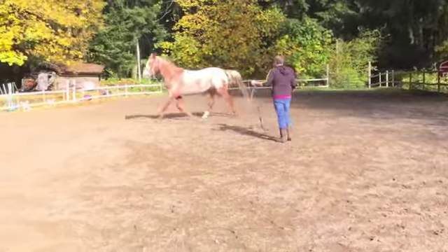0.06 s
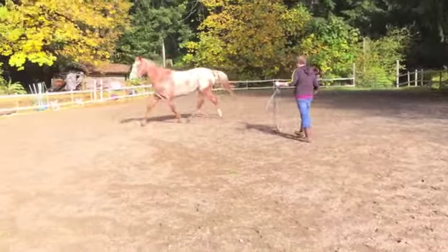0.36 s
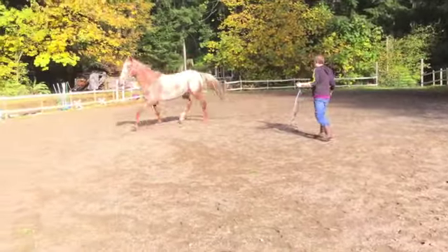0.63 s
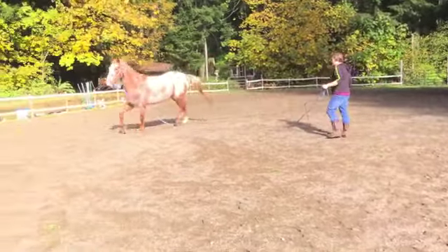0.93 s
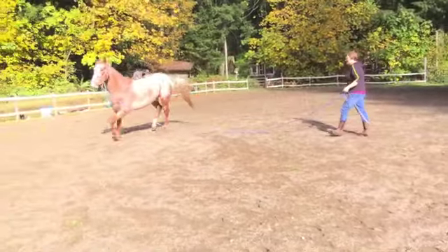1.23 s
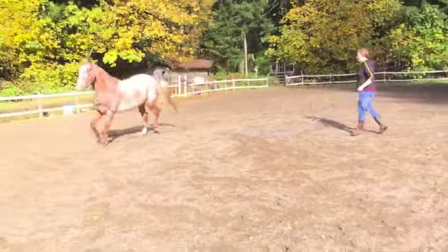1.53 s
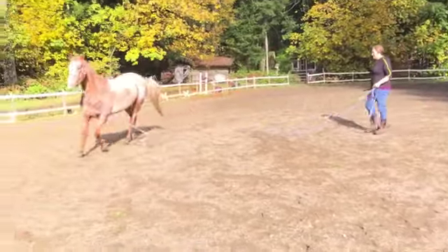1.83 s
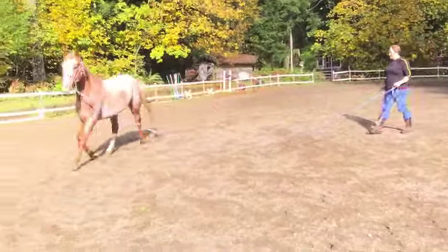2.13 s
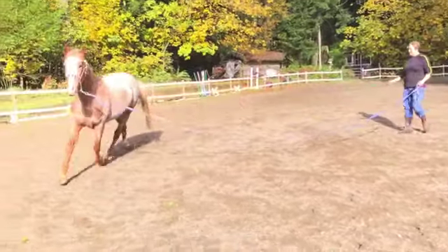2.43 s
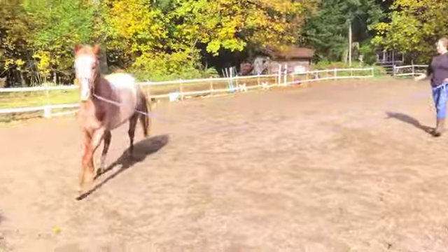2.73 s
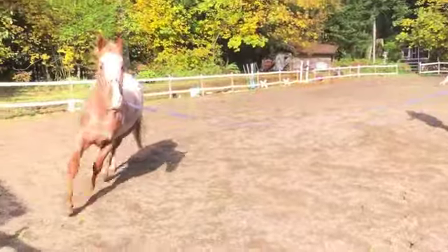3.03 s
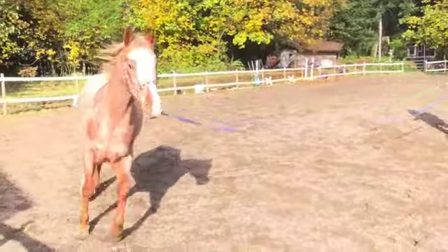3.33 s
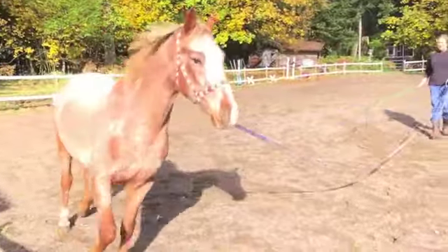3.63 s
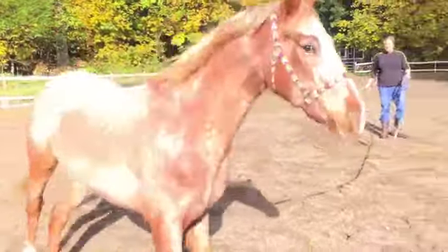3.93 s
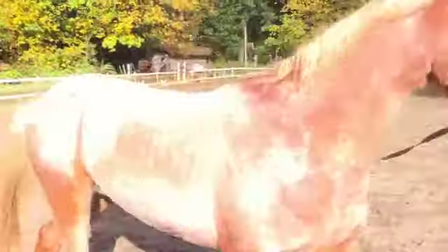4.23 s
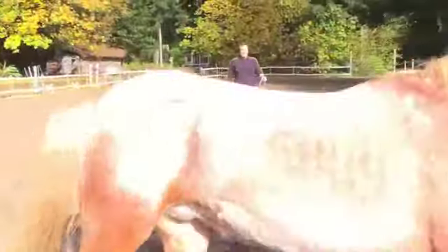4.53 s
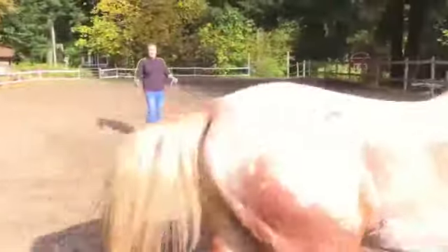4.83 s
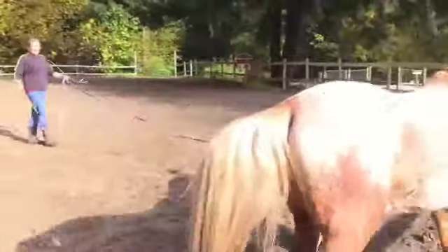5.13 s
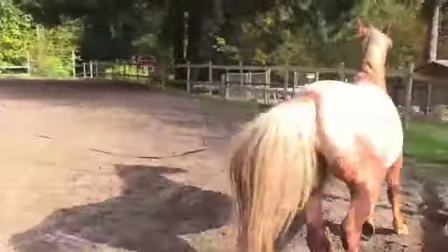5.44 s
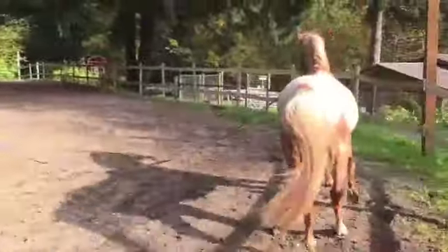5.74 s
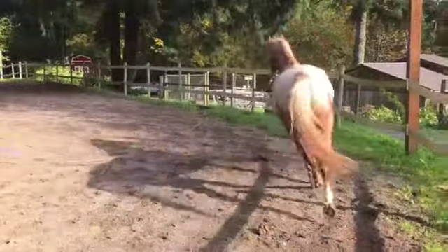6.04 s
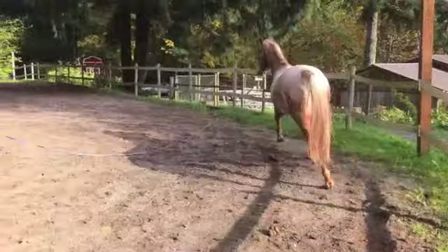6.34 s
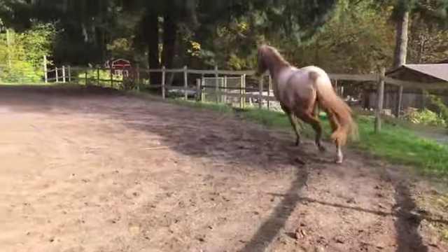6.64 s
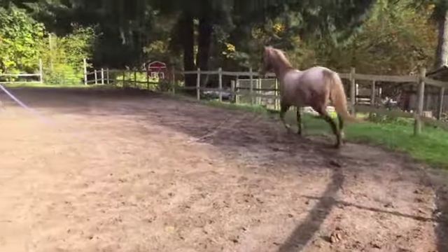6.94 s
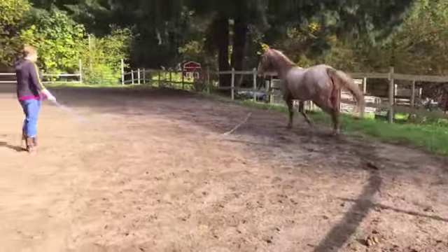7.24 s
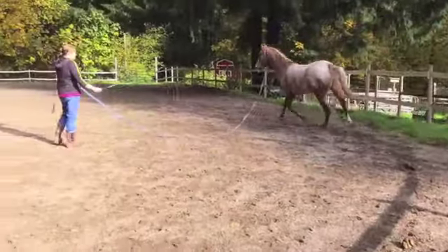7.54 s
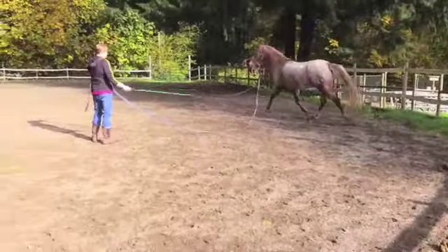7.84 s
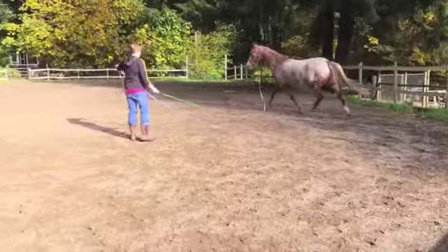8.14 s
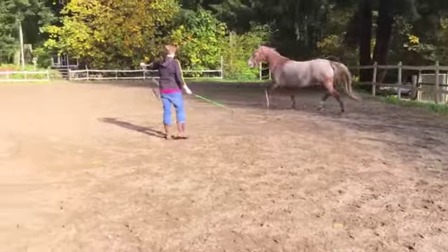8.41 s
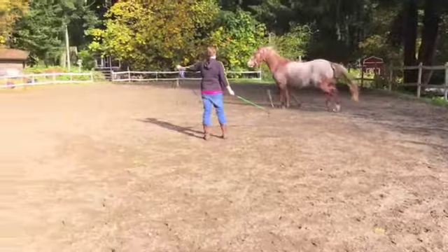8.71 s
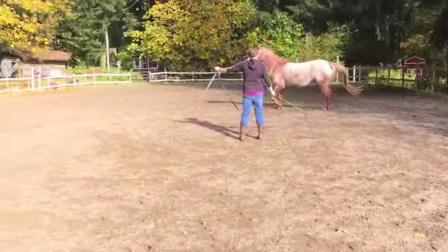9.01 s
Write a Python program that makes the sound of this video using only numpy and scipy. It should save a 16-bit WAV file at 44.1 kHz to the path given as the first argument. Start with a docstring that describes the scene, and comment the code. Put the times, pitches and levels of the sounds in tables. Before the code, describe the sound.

Distant trotting hooves crunch on sand in an open riding arena, over a quiet hiss of outdoor air. The horse comes nearer, with deeper thuds, scraping toes and a few tiny clinks of tack. It is loudest about halfway, passing close to the microphone with a sharp hoof crack and snapping clods. The trot keeps its pace as it moves off, with small pebble ticks and lighter clops.

```python
"""A trotting horse circles on a lunge line in an outdoor dirt arena, passing close to the listener.
Each hoof is an impact on a granular layer: the sand crunches in many tiny collisions, the packed
ground beneath rings in its low modes, and the toe scuffs the sand between landings. Clods snap,
thrown sand trickles down, pebbles tick, the tack jingles, and near the closest point a hoof cracks
on something hard. Fence and trees return a faint tail over a steady hiss and a low rumble."""
import sys
import numpy as np
from scipy import signal
from scipy.fft import rfft, irfft
from scipy.io import wavfile

SR = 44100
rng = np.random.default_rng(int(sys.argv[2]) if len(sys.argv) > 2 else 0)


def master_out(mix):
    """Clip the mix to full scale and print it as 16-bit PCM to the path in sys.argv[1]."""
    frames = np.transpose(np.atleast_2d(mix))
    ceiling = np.clip(frames, -1, 1)
    pcm = np.round(ceiling * 32767).astype(np.int16)
    wavfile.write(sys.argv[1], SR, pcm)


N = 399987

# The trot, in diagonal pairs of hooves: a lands first, b just after. Each row: start and lag of b in
# seconds, crunch of a and b in dB, slide of a and b in seconds, brightness of a and b in dB per octave,
# delay of the full weight in seconds, boom and knock in dB, knock pitch in Hz.
# Levels are relative to an ordinary step.
TROT = [(0.245, 0.041, -7.5, -1.5, 0.041, 0.0043, -1, -0.8, 0.0034, 5.5, 5, 175),
        (0.593, 0.022, -6, -5, 0.051, 0.0099, -3.5, 0, 0.0015, -1, 7.5, 200),
        (0.957, 0.028, -3.5, -4, 0.026, 0.016, 0.5, 0, -0.011, 7, 3, 232),
        (1.276, 0.032, -5, -4, 0.023, 0.016, -3, 2.5, 0.032, 11, 20.5, 210),
        (1.61, 0.024, -1.5, 3, 0.015, 0.027, 1, -0.5, 0.0012, 3.5, 4, 211),
        (1.952, 0.04, 1, -4.5, 0.015, 0.011, 0.3, 1, 0.027, 0.5, 8, 207),
        (2.315, 0.017, 4.5, -1.5, 0.011, 0.016, -1.5, -1.5, -0.0084, -7, -1, 427),
        (2.631, 0.029, -9.5, -1.5, 0.041, 0.013, -0.5, -1, 0.021, -0.5, 7, 159),
        (2.994, 0.02, 1, 0.5, 0.0073, 0.016, 1, 0, -0.014, 0, 2, 166),
        (3.311, 0.036, -6, -1, 0.036, 0.013, -1.5, 0, 0.043, 4.5, -2, 350),
        (3.692, 0.026, 3, -4.5, 0.011, 0.01, 0.7, 0.5, -0.014, 6, -1, 230),
        (4.024, 0.031, 0.1, -1.5, 0.067, 0.011, 0.5, 0, 0.033, 14.5, 8, 577),
        (4.398, 0.026, 1, -4.5, 0.025, 0.01, -0.5, 0.5, -0.0081, 8, 3, 260),
        (4.75, 0.027, -9, -3.5, 0.067, 0.015, -0.9, 0.3, 0.019, 5, -1, 527),
        (5.104, 0.05, -6, -2, 0.024, 0.025, -1, 3, 0.002, -4.5, -0.5, 218),
        (5.458, 0.06, -6.5, -9, 0.036, 0.029, 0, 1.4, 0.059, 3, 2, 166),
        (5.839, 0.056, -1.5, -1.1, 0.017, 0.03, 0.4, 1.5, 0.022, 6.5, -3, 182),
        (6.226, 0.05, -4.5, -9.5, 0.021, 0.022, 3.5, 1, 0.048, 7.5, 5.5, 286),
        (6.589, 0.064, -5, -2, 0.017, 0.017, -1.5, 1, 0.049, 2.5, -3, 236),
        (6.951, 0.06, -2.5, -8.5, 0.017, 0.01, -2.1, -3, 0.058, -5, -1, 230),
        (7.365, 0.025, -5.5, -8.5, 0.024, 0.016, -0.7, 2, 0.015, -17, -7, 383),
        (7.677, 0.046, -13, -12.5, 0.028, 0.013, 2, 5, 0.048, -1.5, -13, 199),
        (8.056, 0.031, -8.5, -4.5, 0.027, 0.011, 2.5, 3, 0.0013, -15, -2.5, 177),
        (8.377, 0.038, -9.5, -16.5, 0.011, 0.021, 2, 1, 0.0018, -9, 0, 250),
        (8.717, 0.029, -12.5, -12, 0.018, 0.042, 0, -0.5, 0.077, 4.5, -11, 200)]
# Crushed sand. Each row: frequency in Hz, relative spectral level in dB.
CRUNCH_SPECTRUM = [(60, -5.5), (200, -5.5), (380, -6), (540, -12.5), (900, -3.5), (1600, -1.5), (2700, 1.5),
                   (4100, 0.5), (5000, -1.5), (9000, -3), (10400, -7), (15000, -9)]
CRUNCH_DB = -27  # an ordinary step at 1 m


def landings():
    """Granular compaction: each hoof crushes the sand as it sinks in, then slides to rest."""
    bursts = []
    for s, lag, db_a, db_b, slide_a, slide_b, bright_a, bright_b, *_ in TROT:
        sink = footing(s)["sink_s"]
        bursts += [(s, CRUNCH_DB + db_a, sink, slide_a, bright_a),
                   (s + lag, CRUNCH_DB + db_b, sink, slide_b, bright_b)]
    return sand(bursts, CRUNCH_SPECTRUM, grains_per_s=9500, spread_db=0.5, ripple_db=6, clump_db=3,
                shape=1.254, families=3)


def knock(hz, cycles, size=4096):
    """A damped oscillation, falling 60 dB in the given cycles; sand cushions the first half cycle."""
    t = np.arange(size) / SR
    t60 = cycles / hz
    cushion = 1 - np.exp(-2 * hz * t)
    return (ring(t, hz, t60) - 0.06 * ring(t, hz * 1.72, t60 / 2)) * cushion


def knocks(touch_db, touch_hz, weight_db):
    """Impact excitation: each hoof knocks lightly at touchdown; the full weight gives the main knock."""
    out = np.zeros(N)
    for s, lag, db_a, db_b, *_, delay, _, knock_db, hz in TROT:
        for at, db in (s, db_a), (s + lag, db_b):
            add(out, at, amp(touch_db + db) * knock(touch_hz * rng.uniform(0.67, 1.12), cycles=5.8))
        add(out, s + delay, amp(weight_db + knock_db) * knock(hz, cycles=9.4))
    return out


# Packed ground under the sand. Each row: frequency in Hz, relative level in dB, 60 dB decay in seconds.
GROUND_MODES = [(61.1, -10, 0.84), (87.8, -1.5, 0.25), (103.3, 2.5, 0.27), (131.2, 2.5, 0.12)]


def booms(step_db, swell_s, detune, size=16384):
    """Modal response: the ground booms under the weight, tuned a little differently at every spot."""
    out, t = np.zeros(N), np.arange(size) / SR
    swell = 1 - np.exp(-t / swell_s)
    for s, *_, delay, boom_db, _, _ in TROT:
        tunings = 1 + detune * rng.uniform(-1.29, 1, len(GROUND_MODES))
        signs = rng.choice([-1, 1], len(GROUND_MODES))
        boom = sum(sign * amp(db) * ring(t, hz * tuning, t60)
                   for (hz, db, t60), tuning, sign in zip(GROUND_MODES, tunings, signs))
        add(out, s + delay, amp(step_db + boom_db) * unit(boom * swell))
    return out


# The hollow of a hoof. Each row: frequency in Hz, relative spectral level in dB.
CLOP_SPECTRUM = [(200, -26), (520, -26), (700, -3.5), (880, -2.5), (1150, -7), (1600, -8), (3000, -10),
                 (15000, -22)]


def clops(rise_s, fall_s):
    """Cavity resonance: each hoof gives a short hollow clop, stronger where the earth is firm."""
    bursts = [(at, CRUNCH_DB + db + footing(s)["clop_db"], rise_s, fall_s, 0)
              for s, lag, db_a, db_b, *_ in TROT for at, db in [(s, db_a), (s + lag, db_b)]]
    return sand(bursts, CLOP_SPECTRUM, grains_per_s=4000, spread_db=3, ripple_db=4.5, clump_db=4,
                shape=1.15, size=8192, families=3)


# Loose sand, then firmer earth. Each row: time in seconds, sinking time of a hoof in seconds,
# thrown sand and hollow clop in dB relative to the crunch.
SURFACE = [(0, 0.0061, -32, -20), (2.3, 0.014, -17, -19), (4.201, 0.0079, -17, -18),
           (5.4, 0.0093, -22, -30), (5.9, 0.004, -31, -10), (7, 0.0043, -24, -20), (8.2, 0.0046, -38, -4),
           (9, .006, -14, -1)]


def footing(s):
    """Compliance of the surface: how slowly a hoof sinks, how much it throws, how hollow it sounds."""
    times, *columns = np.transpose(SURFACE)
    return {name: np.interp(s, times, column)
            for name, column in zip(("sink_s", "spray_db", "clop_db"), columns)}


# Toes scuffing the sand. Each row: time of the peak in seconds, level in dB relative to an ordinary
# drag, rise time in seconds, brightness in dB per octave.
TOE_DRAGS = [(0.545, 2.5, 0.014, -1.5), (1.524, 0, 0.049, -3.2), (1.884, -3.5, 0.03, -2),
             (2.234, -4.5, 0.022, 0), (2.564, -1, 0.033, -2.5), (2.925, -4, 0.051, -3),
             (3.258, 1, 0.037, -0.5), (3.622, -0.5, 0.019, -2.8), (3.669, 6.5, 0.015, -2.5),
             (3.959, 4.5, 0.037, 0), (4.325, 0, 0.028, 0), (4.655, -2.5, 0.023, -0.1),
             (4.696, -3, 0.033, -1.5), (5.065, 4, 0.022, -0.5), (5.371, 5.5, 0.0091, -2),
             (5.411, 1.5, 0.049, -1.5), (5.463, 13.5, 0.017, -2.5), (5.641, -4.5, 0.091, -1),
             (5.78, 5, 0.031, -1.5), (6.133, 3.5, 0.023, -2.5), (6.175, -3, 0.021, 1.5),
             (6.539, 2.5, 0.021, -4), (6.877, 3, 0.018, -2.5), (7.063, 4.5, 0.0081, 2),
             (7.338, 1.5, 0.016, -4.5), (7.973, -6, 0.011, -1), (8.029, 4.5, 0.018, -2.5),
             (8.286, -3, 0.019, -6), (9.012, 3, 0.016, -11)]
# Loose sand in motion. Each row: frequency in Hz, relative spectral level in dB.
SCRAPE_SPECTRUM = [(60, -22), (300, -10.5), (560, -14), (900, -1), (1400, 1.5), (2500, 2), (4100, 3),
                   (5000, 1.5), (9000, -1), (15000, -9)]


def drags(drag_db, fall_ratio):
    """Sliding friction: a toe scrapes the sand as the leg swings through."""
    bursts = [(s, drag_db + db, rise, fall_ratio * rise, bright) for s, db, rise, bright in TOE_DRAGS]
    return sand(bursts, SCRAPE_SPECTRUM, grains_per_s=6800, spread_db=0, ripple_db=5, clump_db=4,
                shape=3.04)


def sprays(delay_s, rise_s, fall_s):
    """Momentum transfer: a step throws sand, the more the harder it lands and the looser the footing."""
    bursts = [(s + lag + delay_s, CRUNCH_DB + max(db_a, db_b) + footing(s)["spray_db"], rise_s, fall_s, 0)
              for s, lag, db_a, db_b, *_ in TROT]
    return sand(bursts, SCRAPE_SPECTRUM, grains_per_s=6000, spread_db=3.6, ripple_db=4, clump_db=5,
                shape=1.1)


# Hooves pushing off. Each row: start in seconds, level in dB.
PUSH_OFFS = [(2.478, -46), (2.727, -45), (4.565, -42), (5.262, -49)]


def shoves(hz):
    """Reaction force: a hoof shoves off and the ground answers with a soft, deep thud."""
    out = np.zeros(N)
    for s, db in PUSH_OFFS:
        add(out, s, amp(db) * knock(hz, cycles=7.6, size=8192))
    return out


# A hoof striking something hard. Each row: start in seconds, level in dB.
HARD_STRIKES = [(4.08, -10.5)]
# Hoof horn. Each row: frequency in Hz, relative level in dB, 60 dB decay in seconds.
HORN_MODES = [(334, -10.5, 0.021), (543, -8, 0.015), (626, -10, 0.028), (1080, -3.5, 0.0066),
              (1900, -1, 0.0041), (2530, -0.5, 0.0077), (3360, -7.5, 0.0081), (4330, -10, 0.0068)]


def cracks(size=4096):
    """Impulse response of hard horn to a sharp blow; neighbouring modes swing opposite ways."""
    out, t = np.zeros(N), np.arange(size) / SR
    blow = sum((-1) ** k * amp(db) * ring(t, hz, t60) for k, (hz, db, t60) in enumerate(HORN_MODES))
    for s, db in HARD_STRIKES:
        add(out, s, amp(db) * blow)
    return out


# Clods and gravel breaking. Each row: time in seconds, level in dB, crumbling time in seconds,
# brightness in dB per octave.
FRACTURES = [(.661, -46.5, 0.0018, -5), (.961, -45.5, 0.0067, -3), (2.3138, -32.5, 0.0022, -0.5),
             (2.329, -39, 0.0015, 2), (2.9919, -27.5, .003, -3.5), (3.762, -33, 0.0023, 4.5),
             (4.037, -27, 0.0033, -4), (4.7868, -16.5, 0.0022, -3.5), (4.982, -43, 0.0053, 12),
             (5.056, -31, 0.0025, -1), (5.147, -22.5, 0.0037, 2), (5.3588, -32, 0.0046, 1),
             (5.4593, -23.5, 0.0031, -3), (5.661, -38.5, 0.0029, 9), (6.5878, -37, 0.0048, 5),
             (6.635, -39, 0.013, .5), (6.6538, -32, 0.0023, -1), (7.0593, -36.5, 0.0017, 1)]
# A breaking clod. Each row: frequency in Hz, relative spectral level in dB.
SNAP_SPECTRUM = [(450, -19), (1000, -6.5), (1800, -4), (3800, 1.5), (6000, -2.5), (15000, -18)]


def snaps(rise_s):
    """Brittle fracture: a clod or a bit of gravel gives way at once under a hoof, then crumbles."""
    bursts = [(s, db, rise_s, fall, bright) for s, db, fall, bright in FRACTURES]
    return sand(bursts, SNAP_SPECTRUM, grains_per_s=14000, spread_db=2, ripple_db=3.5, clump_db=1.5,
                shape=1, size=4096)


# Small contacts of pebbles and hoof horn. Each row: time in seconds, relative level in dB,
# pitch in Hz, 60 dB decay in seconds, chatter time in seconds.
PEBBLE_CONTACTS = [(1.302, -47, 494, 0.014, 0.0032), (3.271, -47.5, 683, 0.0057, 0.0025),
                   (5.52, -43, 508, 0.034, 0.0028), (6.177, -45, 1414, 0.033, 0.0042),
                   (6.635, -40.5, 970, 0.028, 0.0013), (7.4582, -48.5, 1470, .009, 0.0008),
                   (7.722, -50.5, 1600, 0.033, 0.0036), (8.088, -50.5, 850, 0.031, 0.0029)]


def ticks(tick_db, rasp, size=4096):
    """Contact chatter drives three short modes of a small hard body, inside a broad rasp."""
    out, t = np.zeros(N), np.arange(size) / SR
    for s, db, hz, t60, chatter in PEBBLE_CONTACTS:
        contact = rng.standard_normal(size) * t * np.exp(-t / chatter)
        body = ring(t, hz, t60) + 0.37 * (ring(t, hz * 1.16, t60 / 2) + ring(t, hz * 1.37, t60 / 2))
        tone = signal.fftconvolve(contact, body)[:size]
        band = signal.butter(2, [hz / 2, min(hz * 2, SR / 3)], "band", fs=SR, output="sos")
        broad = signal.sosfilt(band, contact)
        add(out, s - chatter / 2, amp(db + tick_db) * (unit(tone) + rasp * unit(broad)))
    return out


# The tack shaking. Each row: time of the peak in seconds, level in dB, pitch in Hz, half-width in seconds.
TACK_SHAKES = [(2.744, -51.5, 4460, 0.0076), (2.895, -54.5, 3930, .008), (3.172, -51, 4120, 0.0092),
               (3.4572, -39.5, 3800, 0.0037), (3.482, -58, 3820, 0.01), (5.259, -43.5, 4240, 0.0056)]
# Its metal. Each row: multiple of the pitch, relative level in dB, 60 dB decay in seconds.
TACK_MODES = [(.8, -3, .004), (1, 3.5, .009), (1.14, -4, .007), (1.6, -5, 0.0033), (2.8, -7.5, 0.00073)]


def jingles(contacts_per_s, size=4096):
    """Inharmonic ringing: flurries of tiny contacts excite each partial of the metal tack differently."""
    out, t = np.zeros(N), np.arange(size) / SR
    middle = t[size // 2]
    for s, db, hz, half_width in TACK_SHAKES:
        shake = np.exp(-((t - middle) / half_width) ** 2)
        rattle = np.zeros(size)
        for ratio, partial_db, t60 in TACK_MODES:
            contacts = shake * rng.standard_normal(size) * (rng.random(size) < contacts_per_s / SR)
            partial = signal.fftconvolve(contacts, ring(t, hz * ratio, t60))[:size]
            rattle += amp(partial_db) * unit(partial)
        add(out, s - middle, amp(db) * rattle * np.linalg.norm(shake) / (np.linalg.norm(rattle) + 1e-12))
    return out


def trickle(db, grains_per_s, spread_db):
    """Shot noise: single grains patter back onto the ground in uneven showers."""
    sizes = rng.standard_normal(N) * amp(spread_db * np.minimum(rng.exponential(1, N), 4))
    patter = shaped(sizes * (rng.random(N) < grains_per_s / SR), SCRAPE_SPECTRUM)
    return amp(db) * waver(per_s=27, depth_db=2.5) * patter


def arena(x, wet_db, t60, size=32768):
    """Scattering: fence and trees return many small echoes that merge into a faint tail."""
    t = np.arange(size) / SR
    echoes = rng.standard_normal(size) * (rng.random(size) < 2000 / SR) * (t > .006)
    tail = shaped(echoes * np.exp(-np.log(1000) * t / t60), [(100, -13), (3000, -14), (12000, -0.5)])
    return x + amp(wet_db) * signal.fftconvolve(x, tail / np.linalg.norm(tail))[:N]


# Still outdoor air. Each row: frequency in Hz, relative spectral level in dB.
AIR_SPECTRUM = [(15, -61), (25, 4), (56, -8), (107, -1), (482, -15), (970, -12), (1270, -16), (3340, -19),
                (9300, -26.5), (14300, -28.5), (15500, -41)]
# Rumble of the ground and the air. Each row: time in seconds, level in dB.
RUMBLE_LEVELS = [(0, -67.5), (2, -66), (3.3, -63.5), (4.4, -61.5), (5.7, -66), (6.35, -68.5), (6.9, -74.5),
                 (9, -74)]


def background(air_db):
    """Ambient noise: a steady outdoor hiss over a low rumble whose level wanders."""
    rumble_spectrum = [(20, -25), (50, 8), (100, 1), (150, -7.5), (300, -18.5), (1000, -66), (4000, -105)]
    swell = amp(curve(RUMBLE_LEVELS)) * waver(per_s=10, depth_db=5)
    rumble = swell * shaped(rng.standard_normal(N), rumble_spectrum)
    return amp(air_db) * shaped(rng.standard_normal(N), AIR_SPECTRUM) + rumble


def sand(bursts, spectrum, grains_per_s, spread_db, ripple_db, clump_db, shape, size=16384, families=4):
    """Superposed random impulses: families of grains, each with its own colour, give way in clumps."""
    out, hz = np.zeros(N), np.fft.rfftfreq(size, 1 / SR)
    t = (np.arange(size) - size // 2) / SR
    octaves = np.log2(np.clip(hz, 900, 10000) / 3000)
    ripple_hz, clump_times = np.geomspace(150, 16000, 44), t[::128]
    hollow = 1 / (1 + (hz / 6000) ** 2)  # clods resonate in the middle range; fine sand hisses evenly
    grid = (families, size)
    for s, db, rise, fall, bright in bursts:
        clumps = np.array([wander(t, clump_times) for _ in range(families)])
        grain_db = spread_db * np.minimum(rng.exponential(1, grid), 3) + clump_db * clumps
        signs = rng.choice([-1, 1], grid)
        grains = amp(grain_db) * signs * (rng.random(grid) < grains_per_s / families / SR)
        ripple = np.array([wander(hz, ripple_hz) for _ in range(families)])
        gain = amp(colour(spectrum, hz) + bright * octaves + ripple_db * hollow * ripple)
        grit = irfft((rfft(grains) * gain).sum(0), size)
        pressure = np.exp(-abs(t / np.where(t < 0, rise, fall)) ** shape)
        burst = grit * pressure
        # the force of the hoof sets the energy, however the grains fall
        add(out, s + t[0], amp(db) * burst * np.linalg.norm(pressure) / (np.linalg.norm(burst) + 1e-12))
    return out


def ring(t, hz, t60):
    """Free decay of one mode, by 60 dB in t60 seconds."""
    return np.sin(2 * np.pi * hz * t) * np.exp(-np.log(1000) * t / t60)


def wander(x, knots):
    """Linear interpolation between Gaussian random heights at the knots."""
    return np.interp(x, knots, rng.standard_normal(len(knots)))


def waver(per_s, depth_db):
    """Random amplitude modulation, at rms 1."""
    t = np.arange(N) / SR
    return unit(amp(depth_db * wander(t * per_s, np.arange(1024))))


def amp(db):
    """Decibels to amplitude ratio."""
    return 10 ** (np.asarray(db) / 20)


def unit(x):
    """Normalisation to rms 1."""
    return x / np.sqrt(np.mean(x ** 2) + 1e-20)


def colour(points, hz):
    """Interpolation of a spectrum in dB on a log-frequency axis."""
    frequencies, db = np.transpose(points)
    return np.interp(np.log(hz + 1), np.log(frequencies), db)


def curve(rows):
    """Linear interpolation of timed values at every sample."""
    return np.interp(np.arange(N) / SR, *np.transpose(rows))


def shaped(x, points):
    """Filtering in the frequency domain, at rms 1."""
    gain = amp(colour(points, np.fft.rfftfreq(len(x), 1 / SR)))
    return unit(irfft(rfft(x) * gain, len(x)))


def add(mix, s, sound):
    """Superposition: a sound joins the mix at s seconds."""
    start = round(s * SR)
    part = mix[max(start, 0):][:len(sound) + min(start, 0)]
    part += sound[max(-start, 0):][:len(part)]


# The horse's circle. Each row: time in seconds, distance from the listener in metres.
HORSE_PATH = [(0, 12.3), (1.5, 11.2), (3, 3.85), (4, 2.11), (4.6, 0.68), (5.4, 1.21), (6, 2.65), (7, 3.43),
              (9, 5.3)]


def scene():
    """Geometric spreading: airborne steps fall with distance, the ground boom with its square root."""
    metres = curve(HORSE_PATH)
    # the levels of the airborne sounds and of the booms hold at 1 m
    airborne = (landings() + clops(rise_s=0.0064, fall_s=0.018)
                + drags(drag_db=-43, fall_ratio=0.74)
                + sprays(delay_s=0.03, rise_s=0.0068, fall_s=0.032)
                + knocks(touch_db=-45, touch_hz=190, weight_db=-30.5)
                + trickle(db=-62, grains_per_s=3200, spread_db=4.5))
    hard = ticks(tick_db=-14, rasp=0.15) + snaps(rise_s=0.00032) + jingles(contacts_per_s=3000) + cracks()
    ground = booms(step_db=-60, swell_s=0.005, detune=0.12) / np.sqrt(metres) + shoves(hz=88)
    horse = airborne / metres + ground + hard
    return (arena(horse, wet_db=-18.5, t60=1.0) + background(air_db=-68))[None]


LOW_CUT_HZ, HIGH_CUT_HZ = 58.4, 15600


def record(dry):
    """Band limiting: a small microphone loses the deepest bass, and a low-pass cuts the top treble."""
    thin = signal.sosfilt(signal.butter(2, LOW_CUT_HZ, "high", fs=SR, output="sos"), dry)
    low_pass = signal.firwin(511, HIGH_CUT_HZ, window=("kaiser", 9), fs=SR)
    return signal.oaconvolve(thin, low_pass[None], "same")


dry = scene()
out = record(dry)
master_out(out)
```